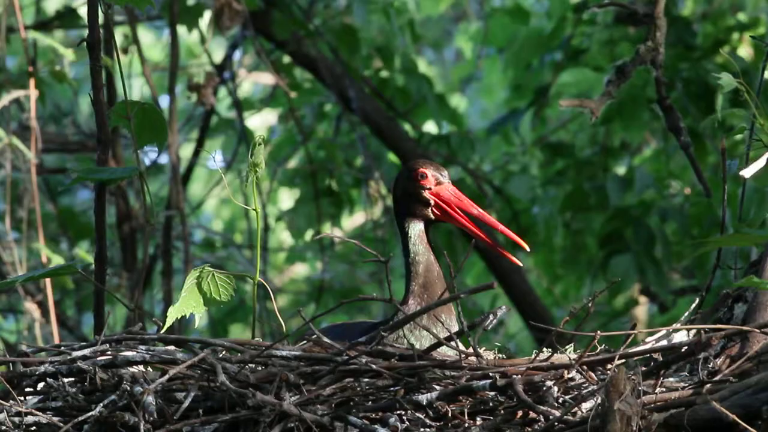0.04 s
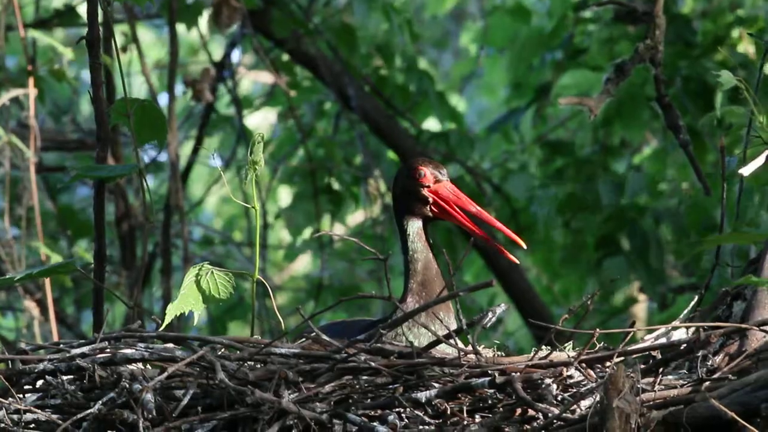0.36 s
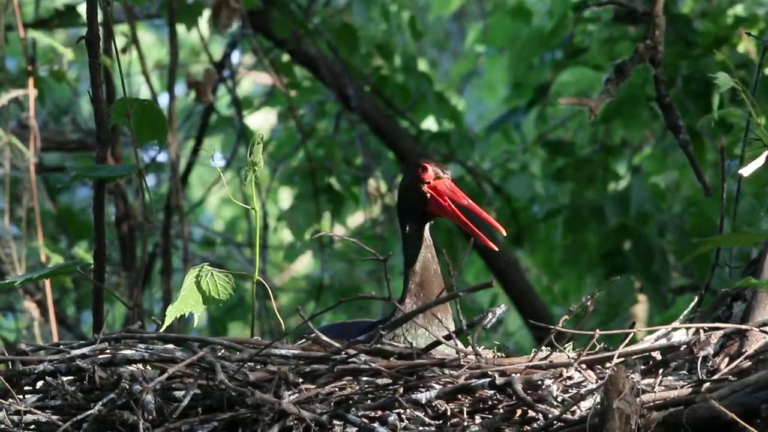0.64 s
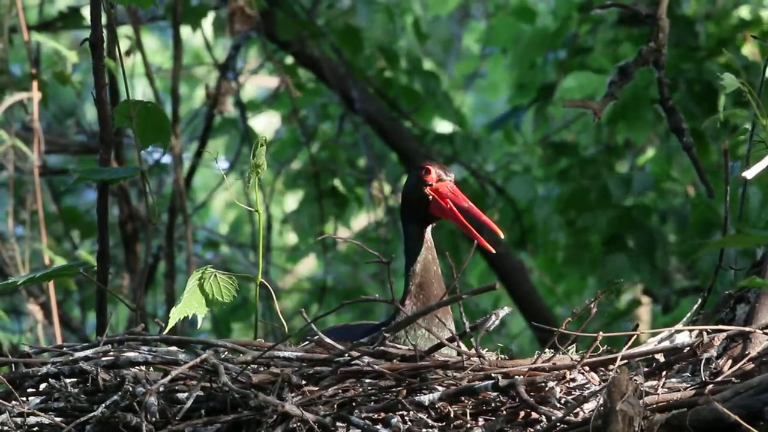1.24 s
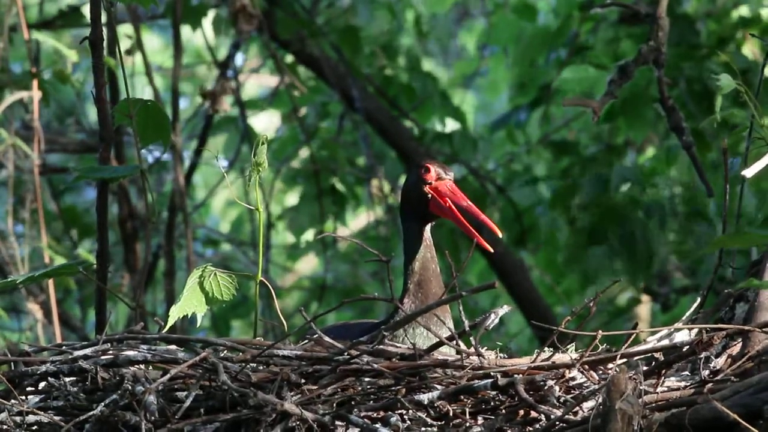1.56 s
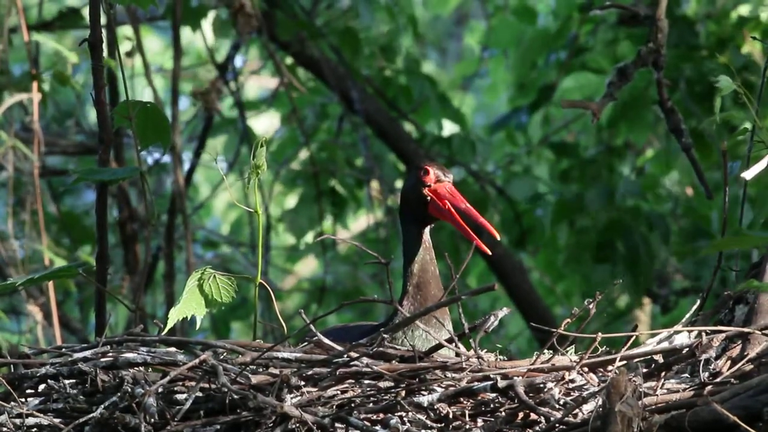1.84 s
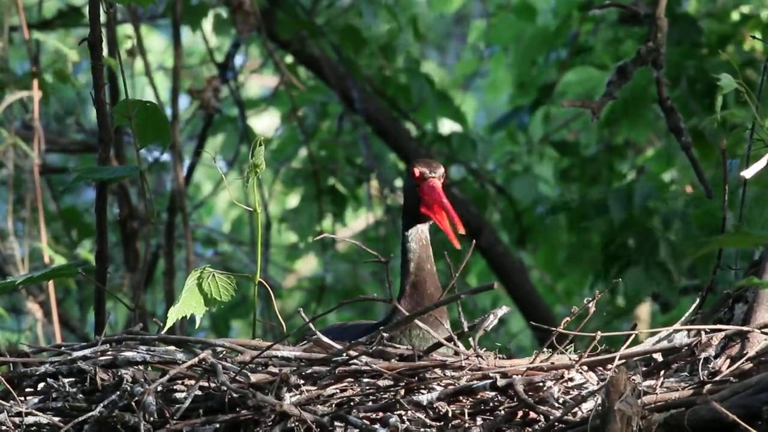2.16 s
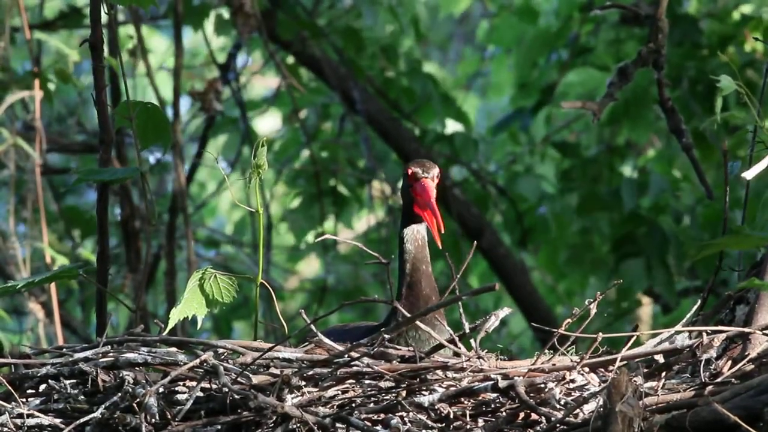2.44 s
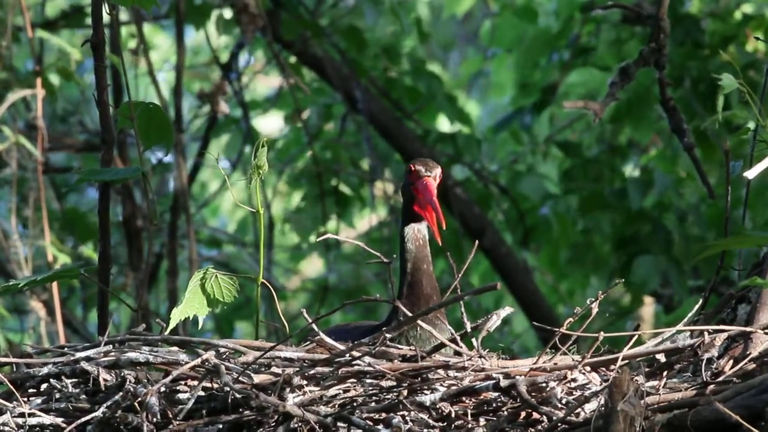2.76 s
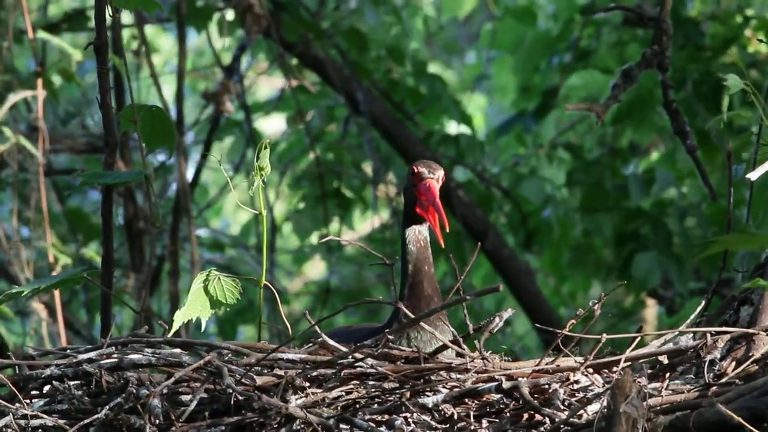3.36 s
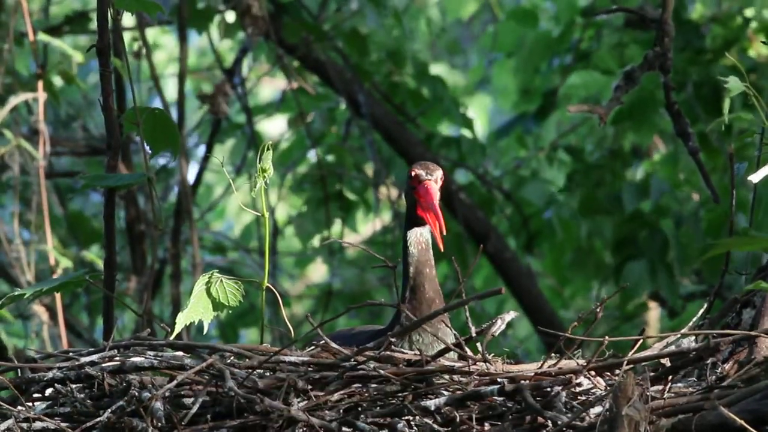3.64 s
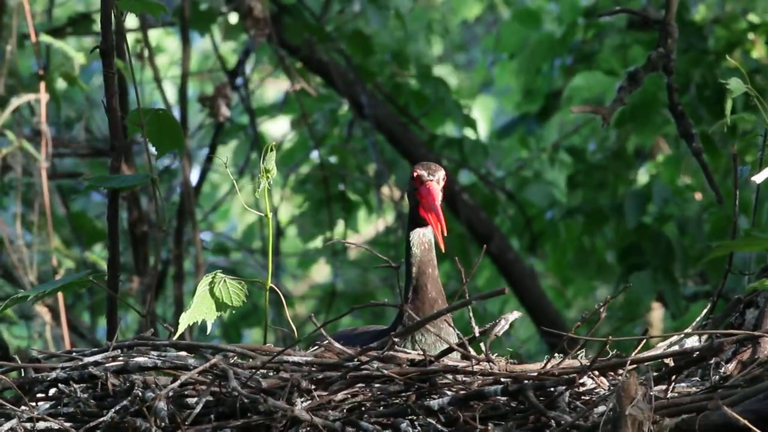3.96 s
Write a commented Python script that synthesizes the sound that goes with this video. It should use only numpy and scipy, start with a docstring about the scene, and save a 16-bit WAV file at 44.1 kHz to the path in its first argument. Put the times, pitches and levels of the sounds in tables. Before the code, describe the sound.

One bright, descending songbird phrase of whistles and chirps echoes through softly hissing woods.

```python
"""A steady forest hiss comes first. Then a small songbird sings one falling phrase: three thin slurs,
four swoops, four quick chips and a flourish, with tiny ticks and pips in between.
Its voice is one gliding whistle with faint overtones.
Trunks and leaves scatter every note into a grainy tail of echoes."""
import sys
import numpy as np
from scipy import signal
from scipy.fft import rfft, irfft
from scipy.io import wavfile
from scipy.ndimage import uniform_filter1d

SR = 44100
rng = np.random.default_rng(int(sys.argv[2]) if len(sys.argv) > 2 else 0)


def bounce(signal):
    """Save signal as a 16-bit WAV file at the path given by the first command-line argument."""
    frames = np.transpose(np.atleast_2d(signal))
    limited = np.clip(frames, -1, 1)
    pcm = np.round(limited * 32767).astype(np.int16)
    wavfile.write(sys.argv[1], SR, pcm)


N = 176400  # 4 seconds


def undb(db):
    """Turn decibels into a number to multiply a sound by."""
    return 10 ** (np.asarray(db) / 20)


def wander(rate_hz, size):
    """A smooth random curve that strays about 1 either side of zero."""
    hold = max(int(SR / rate_hz), 1)
    steps = np.repeat(rng.standard_normal(size // hold + 1), hold)
    return np.sqrt(2) * uniform_filter1d(uniform_filter1d(steps, hold), hold)[:size]


def add(out, start, sound):
    """Mix a sound in at its start time, given in seconds."""
    i = int(start * SR)
    out[i:i + len(sound)] += sound[:N - i]


def forest_hiss(level_db=-45, rise_db_per_s=0.28, drift_db=0.32):
    """A smooth, distant hiss that slowly grows; each octave drifts a little in loudness."""
    # How strong the hiss is from low to high: f/Hz, relative level/dB
    tone_colour = [(15, -58), (25, -26), (39, -18), (64, -9.5), (188, -7), (305, -2.5), (340, -2.5),
                   (410, -2), (469, -3), (567, -3.5), (614, -3.5), (804, -4.5), (919, -4.5), (997, -5),
                   (1450, -5), (1620, -5), (1800, -5.5), (3170, -3.5), (4870, -6.5), (7300, -14),
                   (10900, -17.5), (12800, -20), (15500, -28.5)]
    hz, db = np.array(tone_colour).T
    f = np.maximum(np.fft.rfftfreq(N, 1 / SR), 1)
    spectrum = rfft(rng.standard_normal(N)) * undb(np.interp(np.log(f), np.log(hz), db))
    spectrum *= np.minimum(f / hz[0], 1) ** 2  # fade out the deepest rumble
    octave = np.floor(np.log2(np.maximum(f, 64)))
    hiss = sum(irfft(spectrum * (octave == k), N) * undb(drift_db * wander(5.02, N))
               for k in np.unique(octave))
    t = np.arange(N) / SR
    return hiss / np.std(hiss) * undb(level_db + rise_db_per_s * (t - 1))


def whistle(hz, gain, waver=0.0061, lift_db=0, waver_hz=342):
    """The bird's voice: an unsteady pure tone whose overtones pass only near the beak's high resonance."""
    beak_hz, beak_width_hz, shimmer_db = 12880, 1480, 0.43
    hz = hz * (1 + waver * wander(waver_hz, len(hz)))
    phase = 2 * np.pi * np.cumsum(hz) / SR
    tone = np.sin(phase)
    for multiple, db in ((3, -22.5), (4, -33)):
        through_beak = np.exp(-.5 * ((multiple * hz - beak_hz) / beak_width_hz) ** 2)
        tone += undb(db + lift_db) * through_beak * np.sin(multiple * phase)
    return tone * gain * undb(shimmer_db * wander(rate_hz=342, size=len(hz)))


def sing(shape, notes, flutter=None, flutter_hz=190.2):
    """Whistle one shape once per note, shifted and stretched; a fast flutter of pitch makes it buzz."""
    out = np.zeros(N)
    times, hz, db = np.array(shape).T
    for start, level_db, pitch, width, stretch, lift_db in notes:
        t = np.arange(int(times[-1] * stretch * SR)) / SR / stretch
        contour = pitch * hz.max() * (hz / hz.max()) ** width  # a width above 1 glides further down
        glide = uniform_filter1d(np.interp(t, times, contour), size=110, mode="nearest")
        if flutter is not None:
            cycles = np.cumsum(flutter_hz * (1 + 0.154 * wander(102.2, len(t)))) / SR
            depth = np.interp(t, *np.array(flutter).T)
            glide *= 1 + depth * np.sin(2 * np.pi * cycles)
        gain = undb(level_db + np.interp(t, times, db)) * signal.windows.tukey(len(t), .05)
        add(out, start, whistle(glide, gain, lift_db=lift_db))
    return out


def slurs():
    """Three thin, high whistles that slide down, each louder than the last."""
    # One slur: t/s, f/Hz, level/dB
    shape = [(0, 6250, -30), (.006, 6250, -8.5), (.028, 6250, -16), (.036, 6800, -24), (.047, 6900, -7),
             (.057, 6300, -5.5), (.069, 5650, -2.5), (.081, 5280, 2), (.094, 5230, -6), (.102, 5250, -25)]
    # Each slur: start/s, level/dB, pitch factor, glide width factor, length factor, overtone lift/dB
    notes = [(1.349, -43.5, 1.01, 1.0, 1.0, 0), (1.544, -37, 1.0, 0.98, 0.98, 2),
             (1.729, -33, .995, 1.0, 0.95, 0)]
    return sing(shape, notes)


def tree_echoes(song, echoes_per_s=2500, build_s=0.006):
    """Many separate echoes: a blur from nearby twigs, a quick cloud from leaves, a long one from trunks."""
    twigs, leaves, far_trunks = (-7, 0.033), (-3, 0.28), (-4, 0.73)  # level/dB, time to fade by 60 dB/s
    t = np.arange(SR) / SR
    response = np.zeros(len(t))
    for db, fade_s in (twigs, leaves, far_trunks):
        echoes = rng.standard_normal(len(t)) * (rng.random(len(t)) < echoes_per_s / SR)
        cloud = echoes * (1 - np.exp(-t / build_s)) * np.exp(-np.log(1000) * t / fade_s)
        response += undb(db) * cloud / np.linalg.norm(cloud)
    db_per_octave, middle_hz = 2.5, 3470  # leaves throw back high notes more strongly
    octaves = np.log2(np.clip(np.fft.rfftfreq(N, 1 / SR) / middle_hz, .5, 2))
    scattered = irfft(rfft(song) * undb(db_per_octave * octaves), N)
    return signal.fftconvolve(scattered, response)[:N]


def ticks(length_s=0.0178, fall=.12):
    """Tiny falling whistles between the notes; a very fast waver makes them raspy."""
    # Each tick: start/s, f/Hz, level/dB
    notes = [(1.530, 7900, -49), (1.712, 7730, -46), (1.884, 6700, -45), (2.070, 6400, -42),
             (2.255, 6400, -40.5), (2.44, 7480, -41.5), (2.451, 5700, -40), (3.088, 5800, -43)]
    out = np.zeros(N)
    progress = np.linspace(0, 1, int(length_s * SR))
    for start, hz, db in notes:
        gain = undb(db) * np.sin(np.pi * progress)
        add(out, start, whistle(hz * (1 - fall * progress), gain, waver=0.069, waver_hz=2500))
    return out


def pips(sag=0.022, fade_s=0.0039):
    """Short whistles that sag a little in pitch, one before each swoop and one after the phrase."""
    # Each pip: start/s, length/s, f/Hz, level/dB
    notes = [(1.909, 0.026, 4980, -40.5), (2.082, 0.034, 4840, -33.5), (2.269, 0.023, 4470, -31.5),
             (2.461, 0.042, 4294, -33), (3.606, 0.036, 4750, -43.5)]
    out = np.zeros(N)
    for start, length, hz, db in notes:
        progress = np.linspace(0, 1, int(length * SR))
        glide = hz * (1 + sag * (.5 - progress))
        gain = undb(db) * signal.windows.tukey(len(progress), 2 * fade_s / length)
        add(out, start, whistle(glide, gain, waver=.011, lift_db=2))
    return out


def swoops():
    """Four whistles that dive and climb again, buzzing on the way up."""
    # One swoop: t/s, f/Hz, level/dB
    shape = [(0, 4950, -11), (.006, 4404, -2.5), (.015, 3673, 2.5), (.024, 3171, 0), (.035, 2531, -14),
             (.039, 3160, -8.5), (.048, 3584, 0.5), (.058, 4100, 0.5), (.066, 5234, -5.5),
             (.074, 5480, -6.5), (.081, 5506, -22)]
    # Each swoop: start/s, level/dB, pitch factor, glide width factor, length factor, overtone lift/dB
    notes = [(1.939, -27.5, 1.01, 0.89, .88, -2.3), (2.120, -26.5, 1.02, .96, .96, 1),
             (2.305, -26, .99, 1.01, 1.0, 0.54), (2.494, -27, .985, 1.06, 1.08, 0)]
    # How far the pitch flutters: t/s, fraction of the pitch
    flutter = [(0, 0.0047), (0.032, 0.0053), (0.043, 0.059), (.06, .1), (.07, .01)]
    return sing(shape, notes, flutter)


def chips():
    """Four quick whistles that flick up, then tumble down."""
    # One chip: t/s, f/Hz, level/dB
    shape = [(0, 3398, -12), (.012, 3946, -3.5), (.018, 4133, -5.5), (.023, 4106, 4.5), (.027, 3350, 5),
             (.032, 2660, -3), (.035, 2500, -14), (.040, 2958, -2), (.047, 2814, -1.5), (.055, 2450, 0),
             (.060, 1992, -9.5), (.065, 1530, -12)]
    # Each chip: start/s, level/dB, pitch factor, glide width factor, length factor, overtone lift/dB
    notes = [(2.635, -31.5, 1.01, 0.95, 0.99, 3.4), (2.740, -31, 1.007, 1.0, 0.97, 3.3),
             (2.844, -30, .995, 0.99, 0.95, 2), (2.948, -29, 1, 1.0, 0.94, 2)]
    return sing(shape, notes)


def flourish():
    """The ending: a whistle that arches up and down, then a long falling buzz."""
    # The shapes of the two notes: t/s, f/Hz, level/dB
    arch = [(0, 1730, -15), (.01, 2025, -13.5), (.027, 2193, -6), (.045, 2702, -2), (.064, 3100, 3),
            (.073, 3110, 7), (.081, 2414, -4), (.091, 1600, -16)]
    buzz = [(0, 6700, -15), (.016, 5400, -5.5), (.027, 4700, -1), (.036, 3680, -3), (.055, 3528, 1),
            (.08, 3628, -1.5), (.12, 3720, -0.5), (.139, 3100, -4.5), (.157, 2550, -5), (.177, 2250, -6),
            (.193, 1870, -18), (.217, 1570, -15)]
    # Each note: start/s, level/dB, pitch factor, glide width factor, length factor, overtone lift/dB
    arch_notes = [(3.115, -29.5, 1.0, 1.0, 1.0, -2)]
    buzz_notes = [(3.281, -28.5, 0.98, 0.98, 0.99, 3.8)]
    # How far the pitch of the buzz flutters: t/s, fraction of the pitch
    flutter = [(0, .12), (.04, 0.1), (.075, 0.061), (.115, .035), (.15, .035), (0.221, 0.016)]
    return sing(arch, arch_notes) + sing(buzz, buzz_notes, flutter)


def scene():
    """The hiss, the song heard directly, and its echoes, in one channel."""
    hiss = forest_hiss()
    song = slurs() + ticks() + pips() + swoops() + chips() + flourish()
    return (hiss + undb(-3) * song + tree_echoes(song))[None]


def record(dry):
    """The sound starts after a moment of silence; the highest treble is cut off steeply."""
    start_s, top_hz = .072, 15750
    started = np.arange(N) / SR >= start_s
    treble_cut = signal.ellip(10, .1, 80, top_hz, fs=SR, output="sos")
    return signal.sosfilt(treble_cut, dry * started)


dry = scene()
out = record(dry)
bounce(out)
```